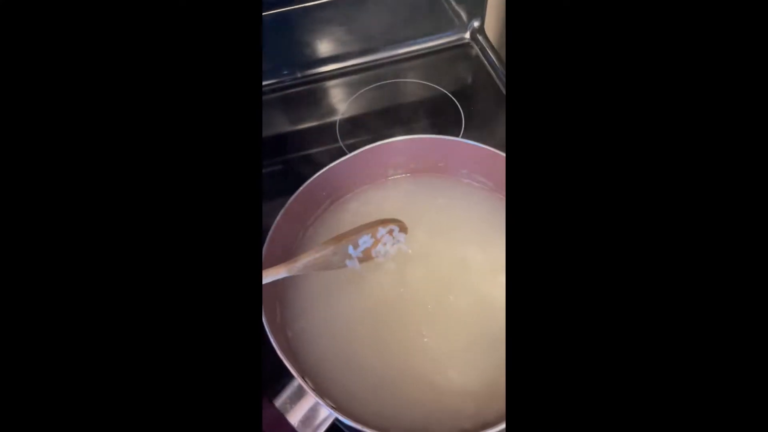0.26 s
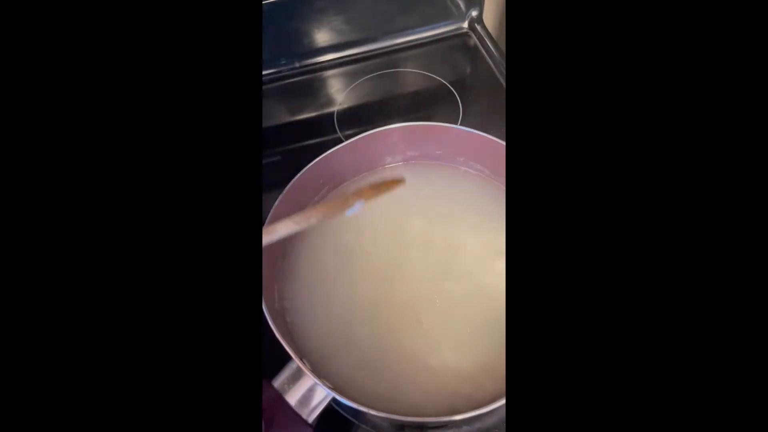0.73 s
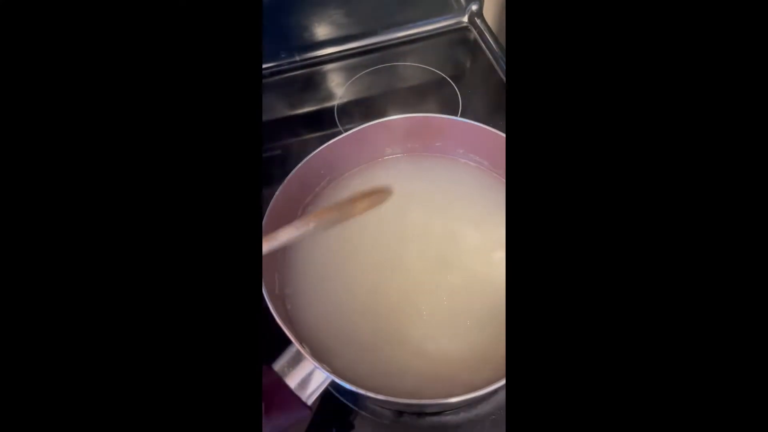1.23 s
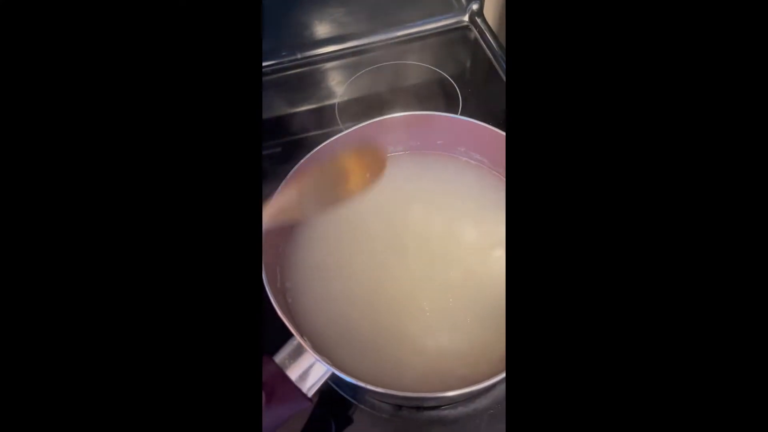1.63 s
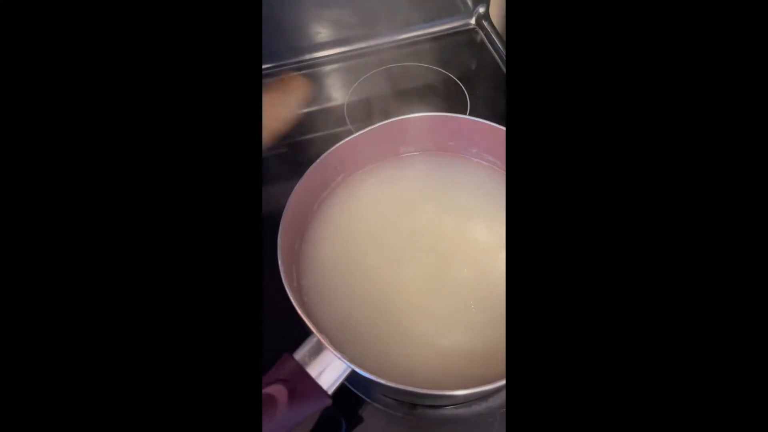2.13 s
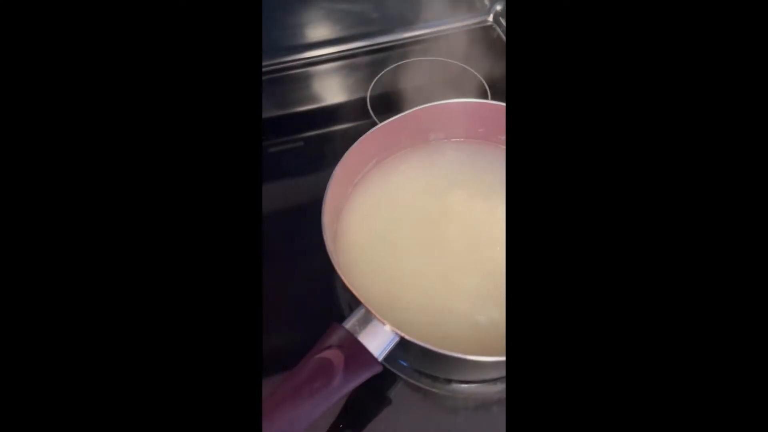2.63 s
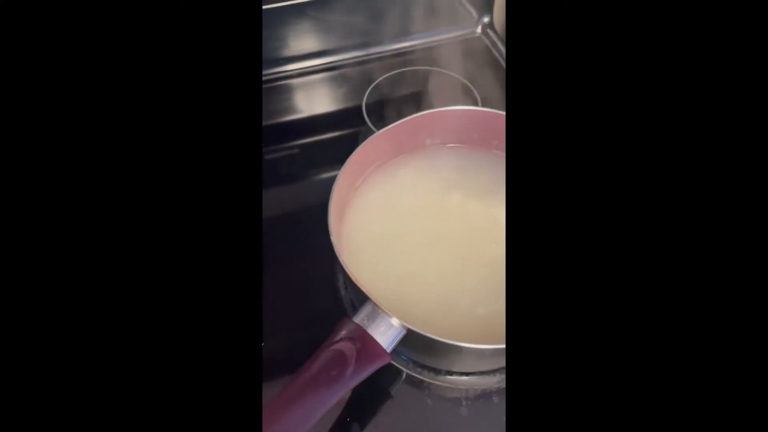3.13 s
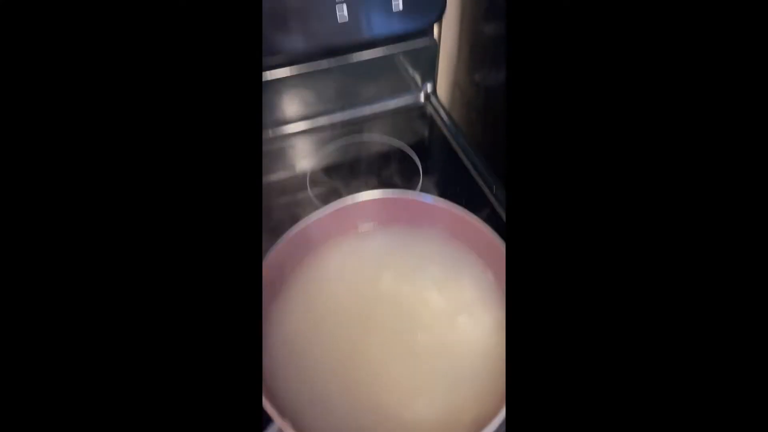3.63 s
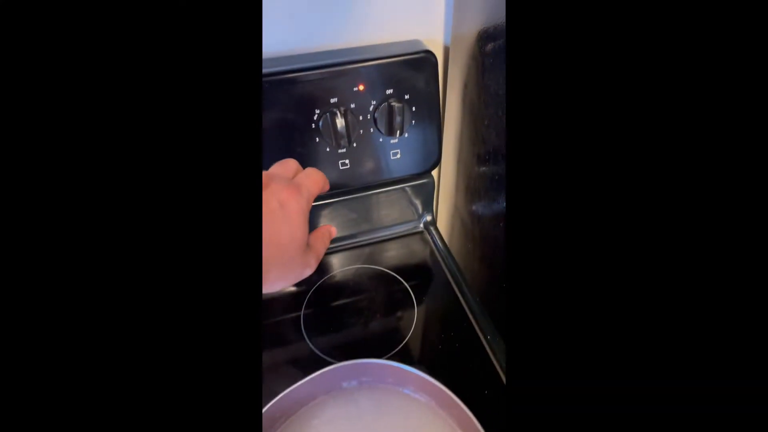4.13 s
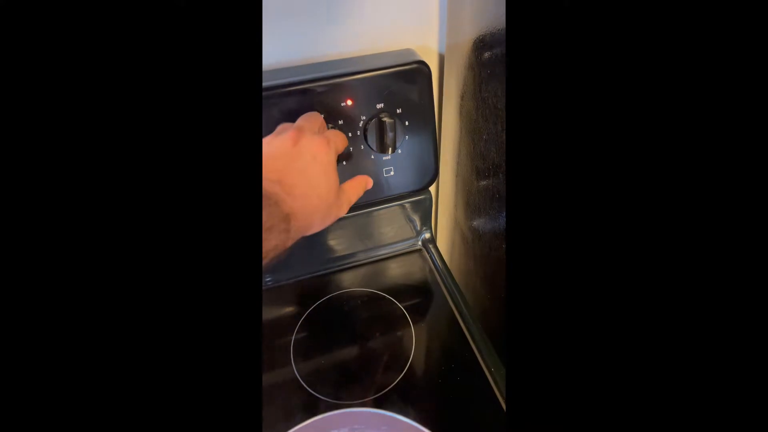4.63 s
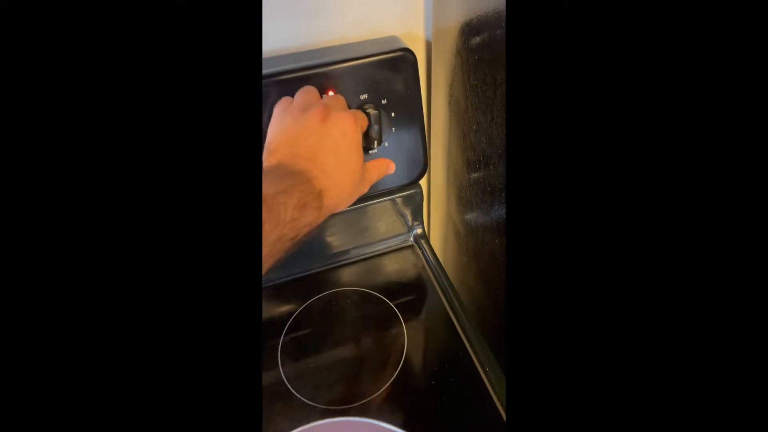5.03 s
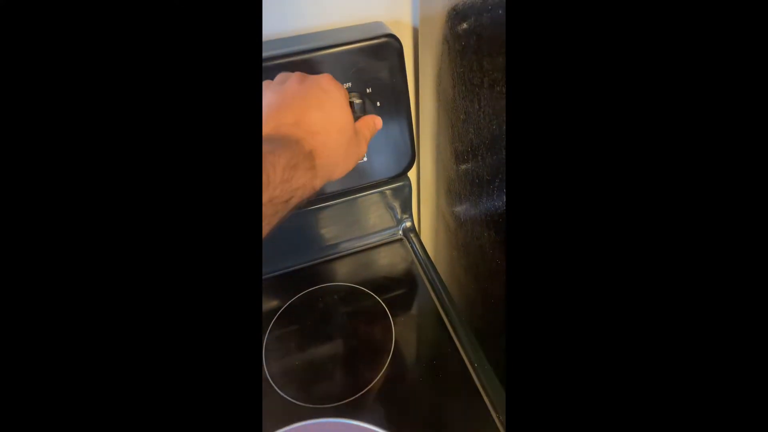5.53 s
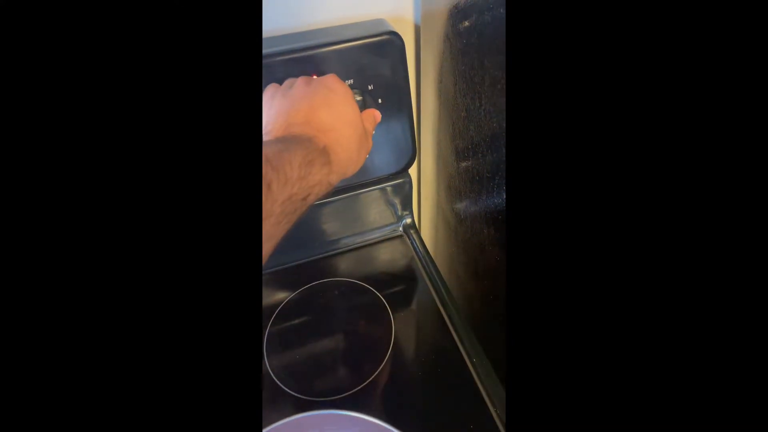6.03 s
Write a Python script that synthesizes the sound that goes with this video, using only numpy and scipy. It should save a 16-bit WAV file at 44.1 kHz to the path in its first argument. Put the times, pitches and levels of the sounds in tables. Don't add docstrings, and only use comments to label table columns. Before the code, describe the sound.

Wet rice drops into a saucepan, a wooden spoon cracks five times on the rim, then quiet simmer, a spoon clack and faint knob clicks.

```python
import sys
import numpy as np
from scipy import signal
from scipy.fft import rfft, irfft, next_fast_len
from scipy.io import wavfile
from scipy.ndimage import uniform_filter1d

SR = 44100
rng = np.random.default_rng(int(sys.argv[2]) if len(sys.argv) > 2 else 0)


def output_pcm(signal):
    pcm = np.clip(np.atleast_2d(signal).T, -1, 1) * 32767
    wavfile.write(sys.argv[1], SR, np.round(pcm).astype(np.int16))


def linear_from_db(decibels):
    return 10 ** (np.asarray(decibels, float) / 20)


N = 276948
PADDED = next_fast_len(N + SR // 4)
HZ = np.maximum(np.arange(PADDED // 2 + 1) * SR / PADDED, 1)
APPROACH_S = (3.6, 4.5)

# start_s, crack_db (peak), thud_db (in the hob)
BLOWS = [
    (0.5873, -11, -17.5),
    (0.8165, -9, -20),
    (1.0314, -5.5, -14.5),
    (1.2263, -5, -12.5),
    (1.642, -9.5, -15.5),
]
# start_s, click_db, body_db, thud_db
LANDINGS = [(0.6535, -47.5, 0, -30.5), (0.6601, -37.5, -0.5, -25), (0.7072, -42, -3, -29),
            (0.8951, -38.5, -15.5, -29.5), (0.9398, -43, -12.5, -33.5), (1.123, -37, -7, -26.5),
            (1.1745, -43.5, -5, -37), (1.3195, -38, -6, -24), (1.36, -54.5, -4.5, -36.5),
            (1.46, -39, 0.5, -29.5), (1.503, -46, 4.5, -49), (1.7244, -34.5, 6.5, -21),
            (1.7719, -49.5, 11, -32)]


def rms_one(x):
    return x / np.sqrt(np.mean(x ** 2) + 1e-20)


def coloured(x, spectrum, turn=1):
    hz, db = np.transpose(spectrum)
    gain = linear_from_db(np.interp(np.log(HZ), np.log(hz), db))
    return irfft(rfft(x, PADDED) * turn * gain, PADDED)[..., :N]


def drift(rate):
    r = np.exp(-80 * np.pi * rate / SR)
    slow = signal.lfilter([1], [1, -2 * r, r * r], rng.standard_normal(N // 40 + 2002))[2000:]
    return np.interp(np.arange(N) / 40, np.arange(len(slow)), rms_one(slow))


def clicks(times, db):
    out = np.full(N, 1e-18)
    np.add.at(out, (np.asarray(times) * SR).astype(int), linear_from_db(np.asarray(db)))
    return out


def strike(start_s, db, shape):
    return signal.oaconvolve(clicks(start_s, db), shape)[:N]


def ring(x, hz, t60):
    r, w = linear_from_db(-60 / (t60 * SR)), 2 * np.pi * hz / SR
    return signal.lfilter([0, np.sin(w)], [1, -2 * r * np.cos(w), r * r], x)


def soften(x, hz):
    r = np.exp(-2 * np.pi * hz / SR)
    return signal.lfilter([(1 - r) ** 2], [1, -2 * r, r * r], x)


def band(x, low_hz, high_hz):
    edges_hz = [low_hz, min(high_hz, .45 * SR)]
    return signal.sosfilt(signal.butter(2, edges_hz, "band", fs=SR, output="sos"), x)


def contacts():
    # start_s, crack_db
    rebounds = [(1.07, -18.5), (1.2483, -15), (1.262, -26), (1.7104, -31.5)]
    graze_lead_s, graze_db = .0078, -29.5
    touches = [(s, db, -17.5, -20) for s, db, _ in BLOWS]
    touches += [(s - graze_lead_s, db + graze_db, -19.5, -17.5) for s, db, _ in BLOWS]
    touches += [(s, db, -27.5, -16) for s, db in rebounds]
    touches += [(s, db, -15.5, body_db) for s, db, body_db, _ in LANDINGS]
    return touches


def knocks(contact_s=.0038, wall_db=-33, wash_db=3):
    # pitch_hz, width_hz, level_db
    crack = [(358, 55, -18.5), (570, 32, -15), (688, 190, -11), (1357, 86, -7.5), (1680, 37, -5.5),
             (1880, 77, -1), (2330, 70, -7), (2780, 77, -8), (3280, 38, -14), (3660, 210, -21),
             (4100, 44, -27), (5060, 190, -30), (5350, 26, -19.5), (5830, 60, -13), (6340, 34, -16.5),
             (6840, 20, -17.5), (7350, 72, -18), (7890, 85, -17), (8740, 60, -22.5), (11700, 240, -25),
             (12600, 260, -26), (13500, 150, -38)]
    # pitch_hz, level_db, t60_s
    wall = [(393, -4.5, 0.13), (713, 6.5, .08), (1212, 2.5, 0.086), (1325, -7.5, 0.15), (1518, -7, 0.31),
            (1809, 0.5, 0.15), (2040, 5, 0.096), (1900, -10.5, 0.16), (2255, 4.5, 0.16), (2470, -8.5, 0.07),
            (3024, -8.5, 0.12), (3258, 4, 0.085)]
    # pitch_hz, level_db (per Hz)
    wash_colour = [(200, -37.5), (330, -17), (700, -18), (1080, -29), (1300, -12.5), (1950, -10),
                   (2600, -15.5), (3300, -13), (4700, -28), (5800, -21.5), (8000, -23), (9500, -33),
                   (12000, -41.5), (15000, -53.5)]
    start_s, db, bright_db, body_db = np.transpose(contacts())
    t = np.arange(400) / SR
    contact = np.clip(t / .0004, 0, 1) * np.exp(-(t / contact_s) ** 6)
    spread = rng.standard_normal((len(start_s), len(crack) + len(wall)))
    phase = rng.uniform(0, 2 * np.pi, len(crack))
    out = 0
    for k, (hz, width_hz, mode_db) in enumerate(crack):
        shape = contact * np.exp(-np.pi * width_hz * t) * np.sin(2 * np.pi * hz * t + phase[k])
        tilt_db = (hz > 4500) * (bright_db + 18.0) + (hz < 1000) * (body_db + 17.5)
        late_s = 0.053 * spread[:, k - 1] / hz
        out = out + strike(start_s + late_s, db + mode_db - 4.0 + 1.6 * spread[:, k] + tilt_db, shape)
    for k, (hz, mode_db, t60) in enumerate(wall):
        tilt_db = (hz < 1000) * 0.82 * (body_db + 18)
        level_db = db + mode_db + wall_db + tilt_db + 2.5 * spread[:, -k - 1]
        out = out + ring(clicks(start_s + 0.0014, level_db), hz, t60)
    wash = coloured(clicks(start_s + .004, 0.77 * db + 31.0 + wash_db), wash_colour)
    return out, wash


def thuds(late_s=.0026):
    # pitch_hz, level_db, t60_s, swell_s
    hob = [(64, -11, .5, .03), (93, -1, .2, .006), (126, -7, .3, .008), (182.5, 0, .21, .006),
           (272, -20, .14, .008), (345, -23, .12, .006)]
    # start_s, thud_db
    jolts = [(0.198, -31), (1.072, -30), (1.705, -42.5), (1.581, -44.5), (1.849, -38), (2.874, -51)]
    blow_lead_s, landing_lead_s = .002, 0.0056
    blow_deep_db, landing_deep_db = -1.5, 2.5
    events = [(s - blow_lead_s, db, blow_deep_db) for s, _, db in BLOWS]
    events += [(s - landing_lead_s, db, landing_deep_db) for s, _, _, db in LANDINGS]
    events += [(s, db, landing_deep_db) for s, db in jolts]
    start_s, db, deep_db = np.transpose(events)
    spread = rng.standard_normal((len(start_s), len(hob)))
    t = np.arange(SR // 2) / SR
    out = 0
    for k, (hz, mode_db, t60, swell_s) in enumerate(hob):
        swell = np.sin(np.pi / 2 * np.minimum(t / (2 * swell_s), 1)) ** 2
        shape = swell * linear_from_db(-60 * t / t60) * np.cos(2 * np.pi * hz * t)
        level_db = db + mode_db + 2.0 + 1.5 * spread[:, k] + (hz < 110) * deep_db
        out = out + strike(start_s + late_s, level_db, shape)
    return out


def sway():
    rise_s, hold_s, level_db, fade_db_per_s = .08, 0.12, -34.5, 30.5
    t, first, last = np.arange(N) / SR, BLOWS[0][0], BLOWS[-1][0]
    fade_db = fade_db_per_s * np.maximum(t - last - hold_s, 0)
    return np.clip((t - first) / rise_s, 0, 1) * linear_from_db(level_db - fade_db)


def rocking():
    jolts = rng.standard_normal(N) * (rng.random(N) < 400 / SR)
    modes = 0
    for hz, db, t60 in [(66.3, -6.5, 1.0), (96, -5.5, .12), (140.0, -1, 0.091), (160, -8, 0.063)]:
        modes = modes + linear_from_db(db) * ring(jolts, hz, t60)
    return sway() * linear_from_db(-1.5) * rms_one(soften(modes, 250))


def ticks(snap_s=0.0046, tail_db=-11, tail_t60_s=0.25):
    # start_s, peak_db,
    # sharpness_db, tone_hz
    grains = [(0.0403, -63, 6, 6000), (0.1124, -45.5, 1, 2900), (0.1193, -35.5, -12, 2470),
              (0.1412, -46.5, -10, 3780), (0.1638, -51, 6.5, 5960), (0.1722, -40, -6, 6000),
              (0.189, -31.5, -6, 6040), (0.652, -52, 2.5, 5962)]
    # start_s, peak_db, sharpness_db, tone_hz
    creaks = [(0.2004, -44, -12, 5200), (0.2224, -78, -9, 2430), (1.9494, -62, -19.5, 1930),
              (2.0394, -74, 14.5, 2470), (2.8094, -78, 12.5, 1870), (3.2444, -72, -16, 2010),
              (5.682, -72, -19, 2595), (6.0294, -69.5, -16.5, 2563)]
    grain_low_db, creak_low_db = -29, 1
    events = [(*row, grain_low_db) for row in grains] + [(*row, creak_low_db) for row in creaks]
    out, t = np.zeros(N + SR), np.arange(SR // 4) / SR
    noise = rng.standard_normal((len(events), len(t)))
    fading = np.exp(-(t / snap_s) ** 2) + linear_from_db(tail_db - 60 * t / tail_t60_s)
    for (start_s, db, high_db, hz, low_db), puff in zip(events, noise):
        high = band(puff, 6000, 8800) + .8 * band(puff, 11200, 13800)
        middle = .7 * band(puff, 2000, 6000) + 1.1 * band(puff, hz * .9, hz * 1.1)
        colour = middle + linear_from_db(low_db + 8) * band(puff, 330, 2200) + linear_from_db(high_db) * high
        out[int(start_s * SR):][:len(t)] += linear_from_db(db + 0.5) * fading * colour
    return out[:N]


def plops():
    # start_s, level_db, pitch_hz, t60_s
    drops = [
        (.2, -36, 1312, 0.069),
        (.274, -55, 1212, 0.087),
        (0.281, -49, 570, 0.027),
    ]
    out, t = np.zeros(N + SR), np.arange(SR // 4) / SR
    for start_s, db, hz, t60 in drops:
        tone = np.sin(2 * np.pi * hz * t * (1 + 0.092 * t))
        out[int(start_s * SR):][:len(t)] += linear_from_db(db - 60 * t / t60) * tone
    return out[:N]


def rattles(events, colour):
    out, t = np.zeros(N + SR), np.arange(SR // 4) / SR
    noise = rms_one(coloured(rng.standard_normal(N), colour))
    for start_s, snap_db, rattle_db, t60 in events:
        snap = linear_from_db(snap_db) * np.exp(-(t / 0.00075) ** 2)
        out[int(start_s * SR):][:len(t)] += snap + linear_from_db(rattle_db - 60 * t / max(t60, .003))
    return noise * out[:N]


def spoon_laid_down():
    # start_s, snap_db, rattle_db, t60_s
    touches = [
        (2.868, -68, -60.5, 0.073),
        (2.876, -35.5, -41.5, 0.075),
        (2.885, -42.5, -58, 0.61),
    ]
    # pitch_hz, level_db (per Hz)
    wood_colour = [(240, -31), (450, -8), (640, -6.5), (800, -14.5), (1150, -8.5), (1900, -11),
                   (2600, -23.5), (3300, -12), (4200, -20), (8800, -27.5), (12100, -36), (13700, -40),
                   (15000, -47.5)]
    return rattles(touches, wood_colour)


def stove_knob():
    # start_s, snap_db, rattle_db, t60_s
    detents = [(4.578, -60.5, -64.5, 0.098), (4.997, -58, -61, 0.13), (5.11, -85, -57.5, 0.12),
               (5.121, -54.5, -62, 0.048), (5.815, -66, -71.5, 0.097)]
    # pitch_hz, level_db (per Hz)
    knob_colour = [(600, -34), (1000, -6), (1700, -7.5), (2350, 0), (3100, -18), (3950, -10), (4800, -18),
                   (6250, -8), (7200, -17), (9300, -21), (11500, -26), (13000, -22), (15000, -40)]
    return rattles(detents, knob_colour)


def appliance():
    # pitch_hz, level_db, t60_s
    casing = [(290, -0.5, 0.05), (346, 1, 0.065), (483, -4.5, 0.03), (804, -15.5, .03)]
    first_s, turn_s = .0795, .15
    far_db, near_db = -51.5, -43.5
    start_s = np.arange(first_s, N / SR, turn_s)
    spread = rng.standard_normal((len(start_s), len(casing)))
    level_db = np.interp(start_s, APPROACH_S, [far_db, near_db])
    thumps = 0
    for k, (hz, db, t60) in enumerate(casing):
        hits = clicks(start_s, level_db + db + 2.5 * spread[:, k])
        thumps = thumps + ring(soften(hits, 400), hz, t60)
    quarters = np.arange(first_s, N / SR - .01, turn_s / 4)
    chance = rng.standard_normal((len(quarters), 2))
    panel = clicks(quarters + .002 * chance[:, 0], far_db - 11 + 4 * chance[:, 1])
    return thumps + ring(soften(panel, 900), 800, 0.073)


def engine():
    # start_s, length_s, level_db
    swells = [(2.36, 0.21, -57.5), (2.88, 0.21, -49.5), (3.184, 1.26, -42.5), (4.68, 0.49, -50.5),
              (5.358, 0.41, -55.5), (5.75, 0.53, -49)]
    idle_hz, speed_up_s, speed_up_hz_per_s = 57.2, 3.6, 5.0
    attack, release = 0.14, 0.1
    t = np.arange(N) / SR
    hz = idle_hz + speed_up_hz_per_s * np.maximum(t - speed_up_s, 0)
    level = 0
    for start_s, length_s, db in swells:
        swell = np.interp((t - start_s) / length_s, [0, attack, 1 - release, 1], [0, 1, 1, 0])
        level = level + linear_from_db(db) * swell
    return np.sqrt(2) * uniform_filter1d(level, size=1500) * np.sin(2 * np.pi * np.cumsum(hz) / SR)


def simmer(per_s=250):
    # pitch_hz, level_db (per Hz)
    water_colour = [(120, -38.5), (200, -13.5), (257, 1), (280, 2), (623, -23), (806, -15.5), (965, -25),
                    (1300, -33), (1690, -66.5), (2860, -120)]
    size = linear_from_db(2.5 * np.minimum(rng.exponential(1, N), 3))
    pulses = rng.standard_normal((2, N)) * (rng.random(N) < per_s / SR) * size
    bubbling = rms_one(coloured(rms_one(pulses) + 1.9 * rng.standard_normal((2, N)), water_colour))
    slosh = np.hypot(1, linear_from_db(40) * sway())
    return bubbling * slosh * linear_from_db(-60 + 1.5 * drift(11))


def room_tone():
    # pitch_hz, level_db (per Hz)
    rumble_colour = [(12, -65.5), (20, -38.5), (42, -5), (59, -1), (91, -6.5), (129, -4.5), (205, -21),
                     (240, -14), (310, -41.5), (530, -120)]
    # pitch_hz, level_db (per Hz)
    hiss_colour = [(650, -30), (1100, -16), (1520, -5), (2410, -3.5), (2790, -8.5), (4130, -10),
                   (4670, -11.5), (7060, -10.5), (8840, -16.5), (10000, -35.5), (11100, -15.5),
                   (12600, -17.5), (16000, -45)]
    t = np.arange(N) / SR
    settling_db = 7.5 * np.exp(-t / 0.25)
    rumble_db = -55 + settling_db + np.interp(t, APPROACH_S, [0, 2]) + 2.62 * drift(4)
    hiss_db = -80.6 + np.interp(t, APPROACH_S, [0, 1]) + .8 * drift(1.5)
    rumble = rms_one(coloured(rng.standard_normal((2, N)), rumble_colour)) * linear_from_db(rumble_db)
    return rumble + rms_one(coloured(rng.standard_normal((2, N)), hiss_colour)) * linear_from_db(hiss_db)


def kitchen(x):
    # pitch_hz, t60_s, level_db
    octaves = [(361.5, 0.75, -18), (802.6, 0.61, -13), (1790, .8, -15.5), (3940, 0.72, -15.5),
               (6800, 0.45, -18.5), (12000, .22, -29.5)]
    t = np.arange(SR) / SR
    noise = rng.standard_normal((2, SR)) * np.clip(t / .002, 0, 1)
    early = linear_from_db(17.5 - 60 * t / 0.076)
    response = 0
    for hz, t60, db in octaves:
        fading = early + linear_from_db(-60 * t / t60)
        response = response + linear_from_db(db) * rms_one(band(noise, hz * .6, hz * 1.6) * fading)
    return signal.fftconvolve(x[None], response / np.sqrt(SR), axes=1)[:, :N]


def scene():
    # pitch_hz, side_minus_mid_db
    near_side = [(60, -42), (99, -33), (160, -24.5), (270, -20.5), (450, -10.5), (740, -6.5), (1220, -4.5),
                 (2010, -13.5), (3330, -3), (5500, -10), (9080, 9), (15000, 0.5)]
    # pitch_hz, side_minus_mid_db
    far_side = [(60, -35), (99, -26), (160, -14), (270, -14.5), (450, -5), (740, -0.5), (1220, 3),
                (2010, -5), (3330, 1.5), (5500, -7), (9080, 11), (15000, 8)]
    # pitch_hz, level_db
    port_null = [(8700, 0), (9500, -4), (10700, -9), (11400, 2.5)]
    direct, wash = knocks()
    small = ticks() + plops() + spoon_laid_down() + stove_knob()
    near = direct + small + thuds() + rocking() + engine() + appliance()
    echo_mid, echo_side = kitchen(wash + linear_from_db(-4.0) * small)
    tone_mid, tone_side = simmer() + room_tone()
    mid = coloured(near + echo_mid, port_null) + tone_mid
    side = coloured(near, near_side, turn=1j) + coloured(echo_side + tone_side, far_side)
    return np.array([mid + side, mid - side])


def low_pass(x):
    return signal.sosfilt(signal.butter(12, 16550, fs=SR, output="sos"), x)


def record(dry):
    mix = signal.sosfilt(signal.butter(3, 38, "high", fs=SR, output="sos"), dry)
    return low_pass(mix)


dry = scene()
out = record(dry)
output_pcm(out)
```